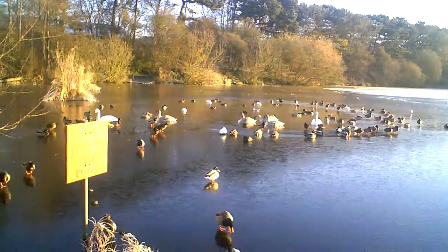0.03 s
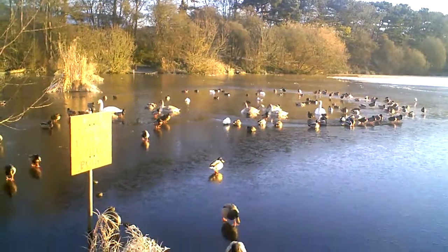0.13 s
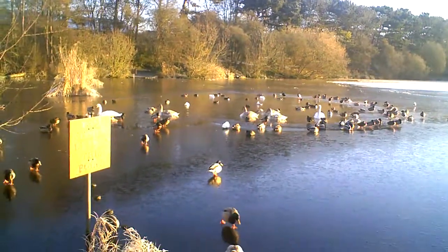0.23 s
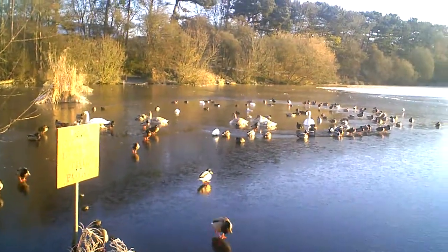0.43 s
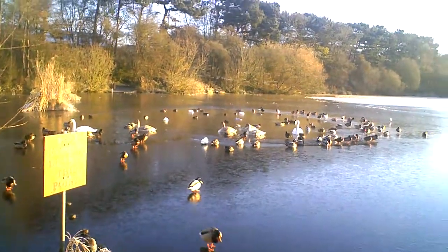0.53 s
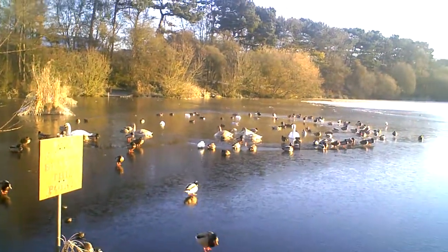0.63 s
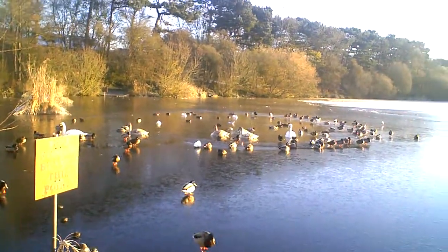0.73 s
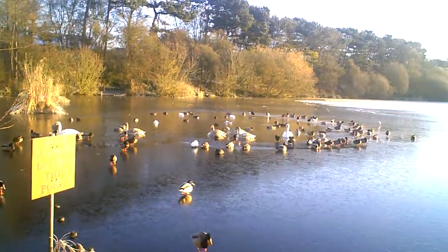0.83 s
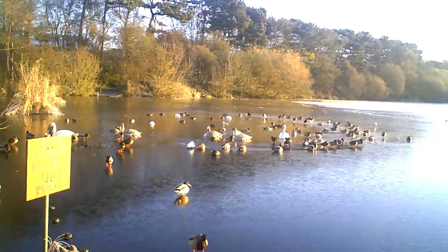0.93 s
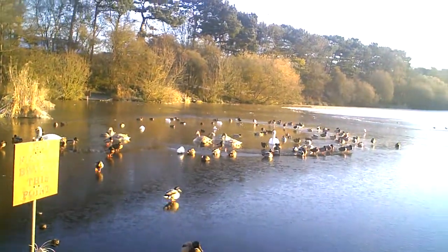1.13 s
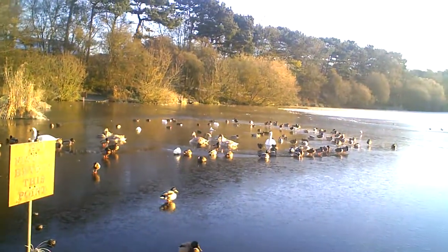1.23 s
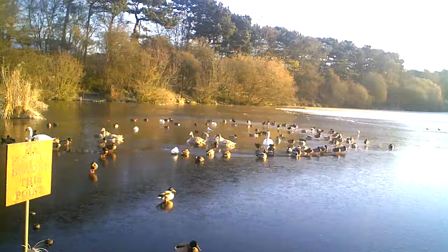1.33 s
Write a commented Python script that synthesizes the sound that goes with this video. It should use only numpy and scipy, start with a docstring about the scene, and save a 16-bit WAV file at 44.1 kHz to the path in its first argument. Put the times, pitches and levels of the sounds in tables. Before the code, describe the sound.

A hand-held camera creaks and knocks once, then a faint duck quacks far away.

```python
"""On a frozen lake, the grip on a hand-held camera creaks by stick-slip friction, knocks once,
then rubs and bumps softly; slips and knocks ring the resonances of the case. Far out on the ice
one duck call dies away and a whole one follows, a rattle of pulses filtered by the throat.
Small birds peep. Under it lies a quiet outdoor hush, with a narrow whirr that swells like
far-off tyres."""
import sys
import numpy as np
from scipy import signal
from scipy.fft import rfft, irfft, next_fast_len
from scipy.io import wavfile

SR = 44100
rng = np.random.default_rng(int(sys.argv[2]) if len(sys.argv) > 2 else 0)


def wav_out(sig):
    """Save sig, one row per channel (or a flat mono array), as 16-bit PCM at SR to the path in sys.argv[1]."""
    wavfile.write(sys.argv[1], SR, np.round(np.clip(np.atleast_2d(sig).T, -1, 1) * 32767).astype(np.int16))


N = 61739


def undb(db):
    """Amplitude grows tenfold for every 20 dB."""
    return 10 ** (np.asarray(db) / 20)


def unit(x):
    """Normalisation to an rms of 1."""
    return x / np.sqrt(np.mean(x ** 2) + 1e-20)


def shape(x, response):
    """Linear filtering multiplies the spectrum by a frequency response."""
    size = next_fast_len(len(x))
    f = np.maximum(np.fft.rfftfreq(size, 1 / SR), 1)
    return irfft(rfft(x, size) * response(f), size)[:len(x)]


def resonance(f, hz, width):
    """A damped oscillator responds as a band-pass, with gain 1 at its centre."""
    return 1j * f * width / (hz * hz - f * f + 1j * f * width)


def noise(points):
    """Coloured noise: white noise filtered by a curve through (Hz, dB) points."""
    hz, db = np.array(points, float).T
    return unit(shape(rng.standard_normal(N), lambda f: undb(np.interp(np.log(f), np.log(hz), db))))


def band(hz, width):
    """Band-limited noise with a Gaussian spectrum."""
    return unit(shape(rng.standard_normal(N), lambda f: np.exp(-((f - hz) / width) ** 2)))


def walk(rate_hz):
    """Low-pass noise wanders at random, with an rms of 1."""
    return band(0, rate_hz)


def blows(t, rows, modes, grit_db, grit_s, size=2048):
    """Impulse response: each push rings the modes, duller if the contact is soft, amid brief grit."""
    # Each row: frequency in Hz, level in dB.
    grit_spectrum = [(300, 0), (1500, 6), (3200, -1.5), (4500, -3.5), (7500, -12), (15000, -20.5)]
    grit = undb(grit_db) * noise(grit_spectrum)
    f = np.fft.rfftfreq(size, 1 / SR)
    body = sum(undb(db) * resonance(f, hz, width) for hz, width, db in modes)
    out = np.zeros(N)
    for at, db, low_hz, high_hz in rows:
        start = int(at * SR) - size // 2
        span = slice(start, start + size)
        contact = np.exp(-(f / high_hz) ** 2) * (1j * f / (low_hz + 1j * f)) ** 2
        delay = np.exp(-2j * np.pi * f * (at - t[start]))
        ring = irfft(body * contact * delay)
        crackle = grit[span] * np.exp(-np.abs(t[span] - at) / grit_s)
        out[span] += undb(db) * (ring / np.abs(ring).max() + crackle)
    return out


def grip_creak(t):
    """Stick-slip friction: the grip lets go in jerks, each exciting the modes of the plastic case."""
    # Each row: time in seconds, peak level in dB, lower and upper roll-off in Hz.
    slips = [(.0952, -46, 205, 1770), (.1010, -43, 194, 1400), (0.1046, -45, 695, 2600),
             (0.1287, -26, 249, 2000), (0.1328, -27, 2020, 2070), (0.1339, -24, 2480, 2160),
             (0.1355, -17.5, 417, 1960), (.1386, -28.5, 700, 2000), (0.1425, -24, 388, 2460),
             (0.1441, -25, 263, 1200), (.2481, -42, 4520, 3240)]
    # Each row: frequency in Hz, bandwidth in Hz, gain in dB.
    case_modes = [(460, 450, -18), (799, 82, 2), (973, 300, -5.5), (1423, 131, 5.5), (1840, 110, -21),
                  (2460, 260, -14.5), (2665, 120, -8), (3230, 260, -6.5)]
    return blows(t, slips, case_modes, grit_db=-31.5, grit_s=0.0011)


def hand_knocks(t):
    """Damped vibration: knocked by the hand, the camera rings dully in the palm."""
    # Each row: time in seconds, peak level in dB, lower and upper roll-off in Hz.
    knocks = [(0.1661, -17.5, 183, 1390), (0.2499, -61, 250, 176), (0.3808, -44.5, 200, 390),
              (0.3831, -46.5, 157, 490)]
    # Each row: frequency in Hz, bandwidth in Hz, gain in dB.
    held_modes = [(412, 210, -9), (625, 290, 12), (1320, 284, 10.5), (1750, 230, -26)]
    return blows(t, knocks, held_modes, grit_db=-30, grit_s=0.00074)


def hand_rubbing(t):
    """Sliding friction: the hand draws smooth swells of grainy noise from the case."""
    # Each row: centre in seconds, half length in seconds, level in dB, relative hiss level in dB.
    rubs = [(0.079, 0.013, -62, -5), (0.104, 0.0027, -53, -5.5), (.132, 0.0048, -40.5, -13.5),
            (0.155, 0.011, -56.5, 1.5), (0.254, 0.022, -68.5, -4.5), (0.298, 0.052, -80, 9),
            (0.384, 0.0027, -53.5, -6.5), (0.436, 0.02, -58.5, -11), (0.485, 0.0069, -84, 9),
            (1.395, 0.01, -60, -17)]
    # Each row of both spectra: frequency in Hz, level in dB.
    body_spectrum = [(130, -28), (450, -22), (820, 4.5), (1100, -1.5), (1600, -11.5), (2300, -16),
                     (8000, -56)]
    hiss_spectrum = [(1200, 4), (2500, -1.5), (3400, 4.5), (4500, -6.5), (8000, -19), (15000, -45)]
    body, hiss = noise(body_spectrum), noise(hiss_spectrum)
    grain = undb(2.78 * walk(200))
    out = np.zeros(N)
    for at, half, db, hiss_db in rubs:
        swell = np.exp(-.5 * ((t - at) / half) ** 2)
        out += undb(db) * swell * grain * (body + undb(hiss_db) * hiss)
    return out


def duck(t):
    """Source and filter: raspy pulses excite the throat's formants and quicken as each call swells."""
    # Each row: start, end of the swell and end of the call in seconds, full level in dB.
    calls = [(-.12, .0, 0.054, -62.5), (.57, 0.749, 0.83, -56.5)]
    # Each row: frequency in Hz, bandwidth in Hz of each of four cascaded stages, gain in dB.
    formants = [(1140, 1400, -13.5), (1712, 450, 1), (1998, 290, 2), (2672, 290, -6)]
    rattle_hz, rise_hz, jitter, swell_db = 88, 17, .03, 12.5
    puff_cycles, attack_s, release_s = .3, 0.036, 0.048

    def throat(f):
        """Formant resonances add in parallel."""
        return sum(undb(db) * np.abs(resonance(f, hz, width)) ** 4 for hz, width, db in formants)

    out = np.zeros(N)
    for start, top, end, db in calls:
        effort = np.clip((t - start) / (top - start), 0, 1)
        pulse_hz = (rattle_hz + rise_hz * effort) * (1 + jitter * walk(54))
        phase = np.cumsum(pulse_hz) / SR % 1
        pulses = (np.diff(phase, prepend=0) < 0).astype(float)
        rasp = rng.standard_normal(N) * np.exp(-phase / puff_cycles)
        smear = .6 * rng.standard_normal(N)  # steady noise stands for the echo off the shore
        voice = unit(shape(unit(pulses) + unit(rasp) + smear, throat))
        gate = np.clip((t - start) / attack_s, 0, 1) * np.clip((end - t) / release_s, 0, 1)
        out += voice * gate * undb(db - swell_db * (1 - effort))
    return out


def small_birds(t):
    """Narrow-band noise has a hoarse pitch; very short bursts of it are heard as peeps."""
    # Each row: centre in seconds, frequency in Hz, level in dB.
    peeps = [(0.495, 2500, -63), (.873, 2500, -62.5), (.983, 2450, -71), (1.217, 2440, -70)]
    half_length_s = 0.0049
    return sum(undb(db) * np.exp(-((t - at) / half_length_s) ** 2) * band(hz, width=140)
               for at, hz, db in peeps)


def far_whirr(t):
    """Random modulation: a tone wavers in pitch within a noise band, and both flutter in level."""
    # Each row: time in seconds, level in dB.
    levels = [(.5, -105), (.63, -67), (.72, -74.5), (.79, -61.5), (.86, -67), (.95, -70), (1.05, -67.5),
              (1.14, -64), (1.4, -68.5)]
    centre_hz, wobble_hz, tone_db, flutter_db = 1090, 34.4, -3, 3
    tone_hz = centre_hz + wobble_hz * walk(23)
    tone = unit(np.sin(2 * np.pi * np.cumsum(tone_hz) / SR))
    core = band(centre_hz, width=153) + undb(tone_db) * tone
    swell_db = np.interp(t, *np.array(levels).T)
    return core * undb(swell_db + flutter_db * walk(25))


def far_roar(t):
    """Exponential growth: a broader noise band gains level at a constant rate in decibels."""
    final_db, db_per_s = -62.5, 14
    return band(1000, width=303) * undb(final_db + db_per_s * (t - t[-1]))


def outdoor_hush():
    """Stationary broadband noise forms the quiet floor of the open air."""
    # Each row: frequency in Hz, relative level in dB.
    hush_spectrum = [(25, 2), (60, -12), (90, -8), (150, -8.5), (330, -3), (600, 0.5), (900, -3.5),
                     (1300, -8), (1900, -12.5), (2900, -15), (4500, -19.5), (8000, -26), (15800, -34)]
    return undb(-63) * noise(hush_spectrum)


def scene():
    """Superposition: the pressures of all sources add in one channel."""
    t = np.arange(N) / SR
    handling = grip_creak(t) + hand_knocks(t) + hand_rubbing(t)
    birds = duck(t) + small_birds(t)
    background = far_whirr(t) + far_roar(t) + outdoor_hush()
    return (handling + birds + background)[None]


def record(dry):
    """Band limiting: the camera thins the bass and cuts the highest treble."""
    low_cut_hz, high_cut_hz = 164, 15850
    high_pass = signal.butter(2, low_cut_hz, "high", fs=SR, output="sos")
    low_pass = signal.ellip(10, .2, 70, high_cut_hz, fs=SR, output="sos")
    return signal.sosfilt(low_pass, signal.sosfilt(high_pass, dry))


dry = scene()
out = record(dry)
wav_out(out)
```